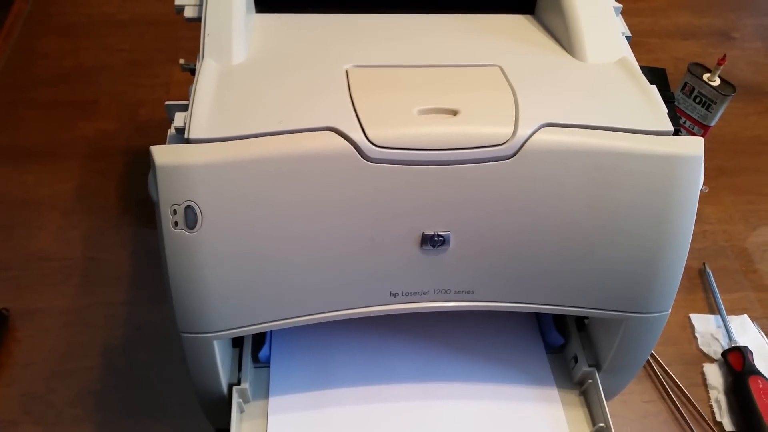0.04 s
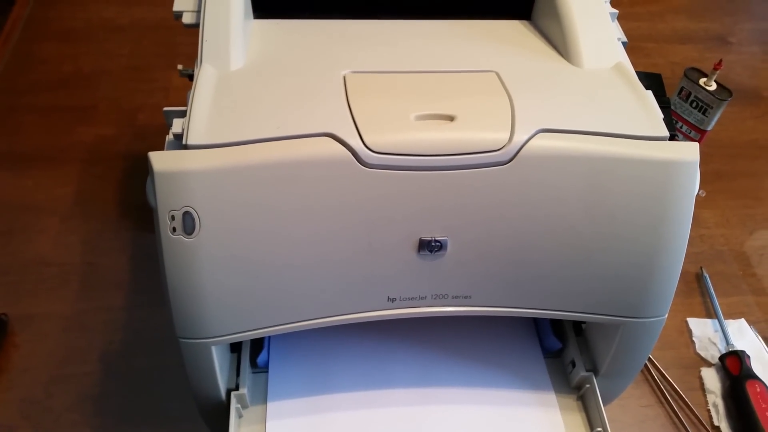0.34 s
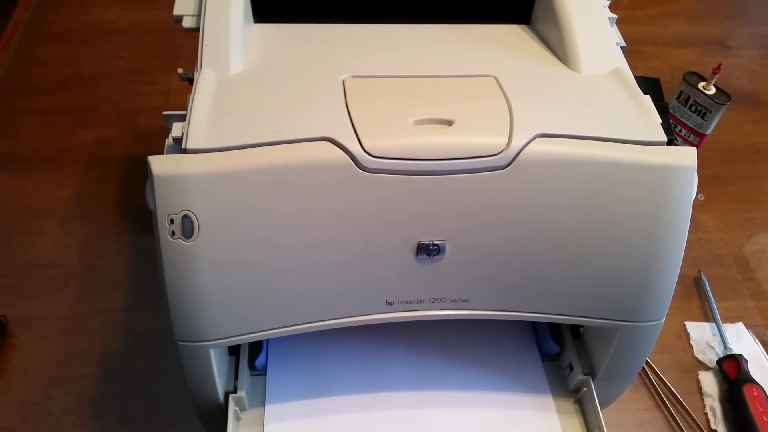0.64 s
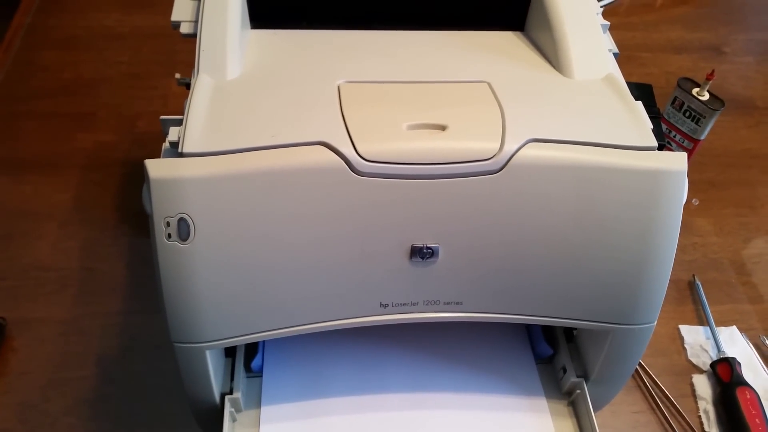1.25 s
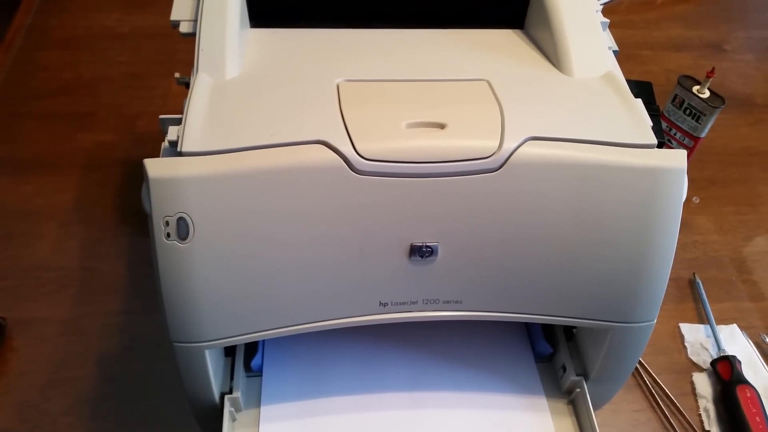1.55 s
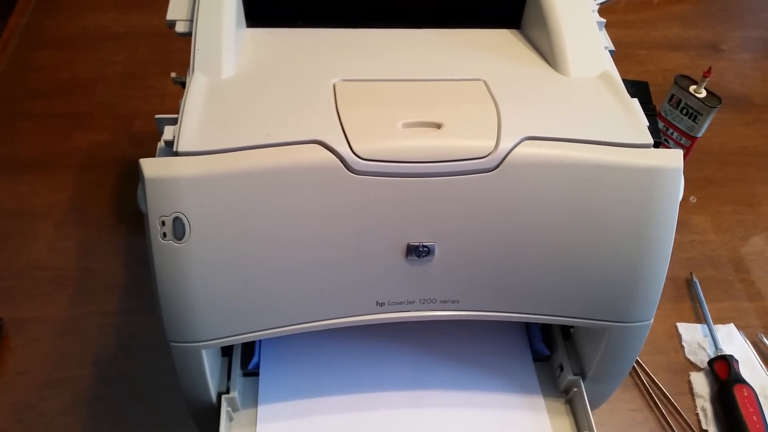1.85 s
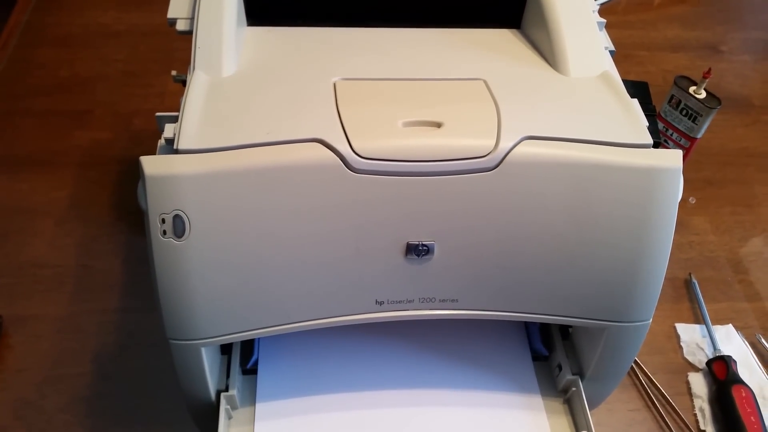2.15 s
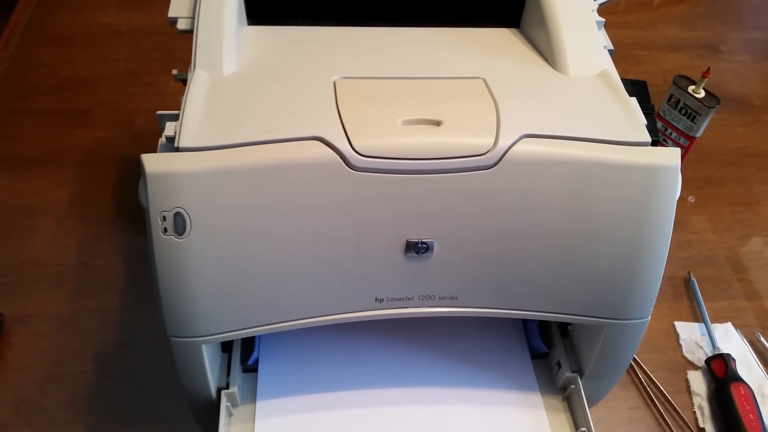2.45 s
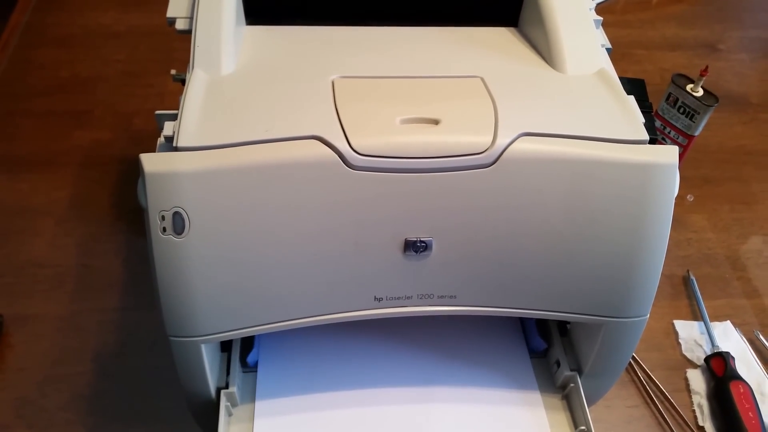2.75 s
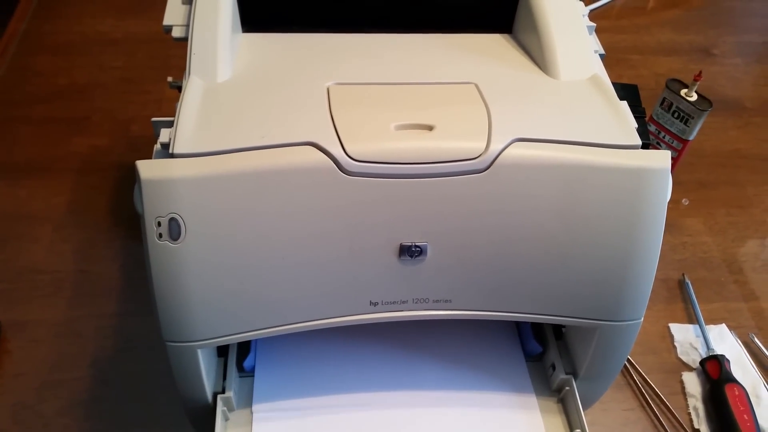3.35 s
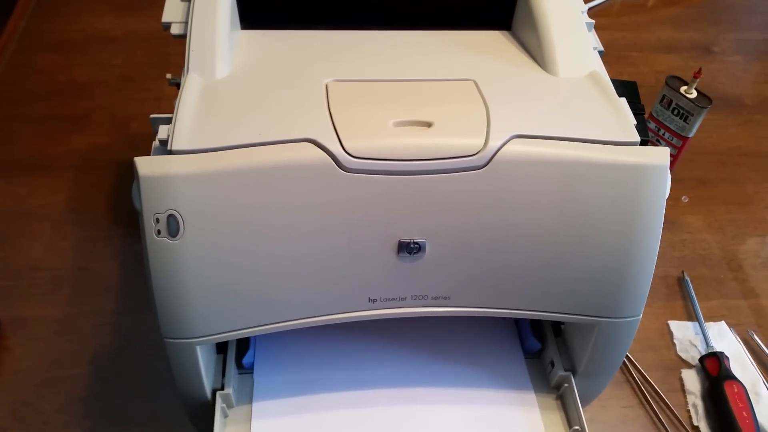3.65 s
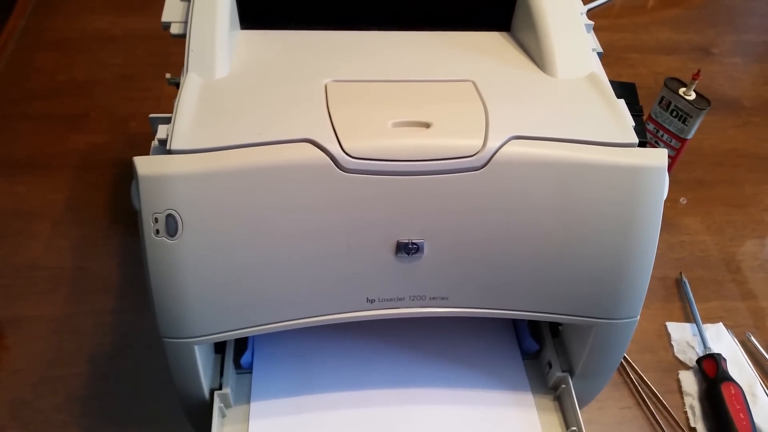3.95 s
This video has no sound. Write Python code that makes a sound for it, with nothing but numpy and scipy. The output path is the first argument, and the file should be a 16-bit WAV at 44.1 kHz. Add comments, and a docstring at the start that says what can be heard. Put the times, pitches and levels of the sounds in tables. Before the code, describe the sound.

A laser printer runs close by indoors, its motor and gears whining over fan noise. Midway, sharp clicks and plastic clunks start the rollers, and a sheet slides in with a hiss. The hand-held microphone is softly bumped.

```python
"""A laser printer runs on a wooden table, heard from close by. From the start its stepper motor and gears
whine over fan noise, while the mirror motor spins up, overshoots and locks at 1 s. Near 1.75 s a solenoid
clicks, the pick-up mechanism knocks in the plastic case and the feed rollers start. From 2.1 s a sheet
slides off the stack with a hiss of friction, and the rollers carry it on to the end. Now and then in the
first three seconds the hand-held microphone is bumped."""
import sys
import numpy as np
from scipy import signal
from scipy.fft import rfft, irfft
from scipy.io import wavfile

SR = 44100
rng = np.random.default_rng(int(sys.argv[2]) if len(sys.argv) > 2 else 0)


def unload_audio(sound):
    """Save the sound as a 16-bit wav file, at the path given as the first command line argument."""
    columns = np.transpose(np.atleast_2d(sound))
    # keep every value between -1 and 1, then stretch to whole-number steps
    steps = np.round(np.clip(columns, -1, 1) * 32767)
    wavfile.write(sys.argv[1], SR, steps.astype(np.int16))


N = 176400
TIME = np.arange(N) / SR

# Low stepper harmonics and thin upper ones: multiples of the step rate; left_db, right_db of each
STEPPER_MULTIPLES = [1, 2, 3, 4, 5, 6, 8, 10, 12]
STEPPER_LEVELS = [(-55, -53), (-48, -49.5), (-49, -48), (-48, -63), (-61, -56), (-74, -72), (-61, -65),
                  (-66, -65.5), (-78, -70)]
WHINE_MULTIPLES = [14, 16, 18, 22, 24, 26, 28, 32, 34, 40, 42, 44, 46, 48, 54, 58]
WHINE_LEVELS = [(-70, -60), (-72.5, -71.5), (-68, -69.5), (-73, -88), (-84, -67.5), (-87, -72.5),
                (-82, -65.5), (-78, -69), (-80, -64.5), (-82, -84), (-70, -72), (-62, -62.5), (-80, -66),
                (-77, -76), (-71, -83), (-81, -82)]
# Load of the paper feed on motor, gears and rollers: time_s, level_db
FEED_LOAD = [(1.72, -28), (1.77, -4), (2.0, -4.5), (2.15, -3.5), (2.6, 0), (2.8, 2), (3.1, 1.5), (3.5, 0),
             (4, 2)]

def stepper_motor(step_hz=231.48, load_boost_db=2.5):
    """Periodic forcing: torque pulses give harmonics of the step rate; the upper ones grow under load."""
    hum = partials(STEPPER_MULTIPLES, STEPPER_LEVELS, step_hz, sway=.32, sway_hz=7.8)
    whine = partials(WHINE_MULTIPLES, WHINE_LEVELS, step_hz, sway=.28, sway_hz=5)
    return hum + whine * from_db(load_boost_db * envelope(FEED_LOAD))


def gears(drive_hz=1237.5, feed_hz=1838):
    """Tooth meshing: the drive gears sing throughout, the feed gears in proportion to the load."""
    drive = partials([1 / 4, 1], [(-61.5, -57), (-39.5, -40.5)], drive_hz, sway=.071, sway_hz=12)
    feed = partials([1], [(-58, -58)], feed_hz, sway=.44, sway_hz=6.7)
    return drive + feed * envelope(FEED_LOAD)


# Spin-up and overshoot of the mirror: time_s, rotation_hz
MIRROR_SPEED = [(0, 385), (.2, 446), (.42, 500), (.58, 534), (.65, 541), (.72, 509), (.8, 499), (.92, 507)]
# Case resonances that its whine sweeps through: rotation_hz, gain_db
MIRROR_RESONANCES = [(385, -4), (420, -9), (450, 5), (470, -3), (495, -1), (505, 0.5), (520, 6), (532, -2)]

def mirror_motor(lock_s=1.0, locked_hz=505.1):
    """Forced resonance: the rotor's harmonics swell as its speed passes the resonances of the case."""
    rotation_hz = np.interp(TIME, *np.transpose(MIRROR_SPEED + [(lock_s, locked_hz)]))
    levels_db = [(-55, -58), (-65, -63), (-53.5, -49.5)]
    whine = partials([1, 2, 4], levels_db, rotation_hz, sway=.18, sway_hz=7)
    return whine * from_db(at_hz(MIRROR_RESONANCES, rotation_hz))


# Knocks of plastic parts: start_s, case_db, tilt_db_per_octave, contact_s, ring_hz, ring_db, ring_t60_s
KNOCKS = [(.002, -11, -6.5, .002, 394, -30, 0.21), (.886, -11, -9, 0.0013, 403, -26.5, 0.068),
          (.917, -24, -11, .002, 402, -28.5, 0.083), (1.7585, 0, 1, .001, 978, -7.5, 0.026),
          (1.773, -4, -1.5, .002, 345, -31, 0.15), (1.813, -4.5, -1, 0.0025, 800, -43, 0.034),
          (1.824, -13, -2, .001, 350, -24, 0.055), (1.872, -10, -5.5, 0.0036, 757, -26.5, .06),
          (1.911, -20, -3, .002, 800, -20.5, 0.028), (2.051, -7, 0.5, 0.00071, 323, -25, 0.13),
          (2.066, -16, -5, .002, 734, -24, .05), (2.228, -20.5, 2.5, .003, 680, -30, 0.044),
          (2.512, -13, -3, 0.0026, 470, -48, 0.055), (2.665, -11.5, -9, 0.0023, 723, -25.5, .04),
          (2.782, -7, 0, 0.0027, 970, -22, .04), (2.7866, -7, -1.5, 0.0016, 898, -22, .04),
          (2.8415, -3.5, -6, .002, 878, -12, 0.026), (2.852, -16, -8, .002, 233, -21.5, 0.053),
          (3.555, -15, -7, .0005, 800, -26, 0.018), (3.585, -24, -4, .004, 440, -34, .15)]
# Response of the case to a knock: frequency_hz, density_db
CASE_SPECTRUM = [(60, -65), (180, -68), (350, -58), (600, -51.5), (1000, -53), (1500, -55.5), (2300, -54.5),
                 (3200, -64.5), (6000, -73.5), (10000, -71.5), (14000, -99)]

def pickup_knocks(left_minus_right_db=-1.5):
    """Impact excitation: each struck part rings in one mode, along with the many modes of the case."""
    out = np.zeros((2, N))
    pan_db = left_minus_right_db * np.array([[.5], [-.5]])
    for start_s, case_db, tilt_db, contact_s, ring_hz, ring_db, t60_s in KNOCKS:
        part = from_db(ring_db + pan_db) * ring(ring_hz, t60_s, build_s=.0014)
        case = from_db(case_db) * burst(CASE_SPECTRUM, contact_s, tilt_db=tilt_db)
        add(out, start_s, case + part)
    return out


# Solenoid and latch clicks: start_s, level_db, length_factor
CLICKS = [(1.7476, -0.5, .8), (2.021, 0.5, 1.0), (2.051, -5.5, .5), (3.004, -1.5, 0.37)]
# Spectrum of a click: frequency_hz, density_db
CLICK_SPECTRUM = [(150, -72), (500, -57.5), (1000, -59.5), (2000, -61.5), (3200, -67.5), (5000, -68.5),
                  (7000, -74.5), (10000, -63.5), (14000, -74)]

def solenoid_clicks():
    """Impulse response: a very short contact excites a wide band of frequencies."""
    out = np.zeros((2, N))
    for start_s, level_db, length in CLICKS:
        add(out, start_s, from_db(level_db) * burst(CLICK_SPECTRUM, attack_s=.00065, length=length))
    return out


# Rollers, sliding sheet, and case and tray under the turning pick-up cam: frequency_hz, density_db
ROLLER_SPECTRUM = [(100, -88), (400, -81), (1000, -88), (2000, -85.5), (3000, -90.5), (5000, -94.5),
                   (7000, -91.5), (10000, -90), (11500, -95), (13000, -90.5), (14500, -112)]
SLIDE_SPECTRUM = [(200, -92), (600, -74.5), (1200, -76.5), (2500, -89), (4000, -90.5), (6000, -89.5),
                  (7300, -81.5), (8200, -85), (10000, -83.5), (12000, -87.5), (14500, -89)]
RUMBLE_SPECTRUM = [(30, -90), (100, -73.5), (200, -64), (330, -71.5), (450, -63), (600, -75), (900, -78.5),
                   (1500, -86.5)]
# Course of the slide and of the rumble: time_s, level_db
SLIDE_LEVEL = [(2.1, -28), (2.15, -0.5), (2.35, -1), (2.42, 1), (2.51, 2), (2.56, -8), (2.7, -28)]
RUMBLE_LEVEL = [(1.75, -30), (1.8, 1.5), (1.92, 3), (2.0, -16), (2.08, 3), (2.2, -15), (2.46, -18),
                (2.53, 2), (2.62, -20), (2.7, 2.5), (2.8, -2.5), (2.89, 5.5), (3.0, -19), (3.15, -44)]

def paper_feed(grain_db=1.27):
    """Friction noise: rollers and sheet rub with a fine grain, over the rumble of case and tray."""
    rollers = noise(ROLLER_SPECTRUM) * envelope(FEED_LOAD)
    sheet = noise(SLIDE_SPECTRUM) * envelope(SLIDE_LEVEL)
    grain = from_db(grain_db * drift(250))
    rumble = noise(RUMBLE_SPECTRUM) * envelope(RUMBLE_LEVEL)
    return (rollers + sheet) * grain + rumble


# Soft bumps on the microphone: start_s, level_db, pitch_hz
BUMPS = [(0.271, -30, 141), (.351, -27.5, 110), (0.637, -20, 135), (.982, -22, 80), (1.888, -21.5, 96.5),
         (2.913, -17, 130), (2.932, -19.5, 103)]
# Deep rumble of the grip: frequency_hz, density_db; and its course: time_s, level_db
HANDLING_SPECTRUM = [(15, -71), (32, -65), (50, -71), (120, -100)]
HANDLING_LEVEL = [(1.85, -25), (2.0, -1), (2.1, 3.5), (2.25, -4), (2.35, -14), (2.55, -16), (2.62, -4),
                  (2.8, -22)]

def handling(right_db=-32.5):
    """Structure-borne sound: fingers shift on the microphone's housing and bump it, mostly on the left."""
    out = noise(HANDLING_SPECTRUM) * envelope(HANDLING_LEVEL)
    for start_s, level_db, pitch_hz in BUMPS:
        thump = 2 * ring(pitch_hz, t60_s=.037, build_s=.003)
        add(out, start_s, from_db([[level_db], [level_db + right_db]]) * thump)
    return out


# Rush of the fan and gear train: frequency_hz, density_db
FAN_SPECTRUM = [(25, -86), (48, -90), (75, -73.5), (100, -82.5), (135, -75.5), (160, -75), (225, -70.5),
                (270, -78.5), (335, -67.5), (420, -78), (520, -75.5), (600, -81), (770, -74.5), (1070, -88),
                (1350, -79.5), (1560, -82), (1850, -76.5), (2200, -84.5), (2900, -96.5), (3400, -89.5),
                (5000, -96.5), (7000, -93), (10000, -95.5), (11000, -94), (14500, -101.5)]

def fan(blade_hz=135.5, flutter_db=1.0):
    """Turbulence gives a broad, fluttering rush; the passing blades add an uneven hum."""
    rush = noise(FAN_SPECTRUM) * from_db(flutter_db * drift(30))
    return rush + partials([1], [(-60, -59.5)], blade_hz, sway=.45, sway_hz=6)


# Likeness of the sound at the two microphone ports: frequency_hz, correlation (limited to 1 in use)
COHERENCE = [(40, 0.67), (250, 1.1), (600, 1.03), (1200, 0.93), (2000, 0.38), (4000, 0), (8000, 0.08),
             (13000, 0)]
# Level difference between the ports: frequency_hz, left_minus_right_db
BALANCE = [(100, 0.5), (600, -1.5), (1200, -1.5), (2200, -7), (3600, -3), (5500, -14), (7500, -12),
           (10000, 0.5), (13000, 4)]

def noise(spectrum, size=N, tilt_db=0):
    """Partial coherence: shared and opposed noise mix at the two ports; tilt_db is per octave."""
    hz = np.fft.rfftfreq(size, 1 / SR) + 1
    mid, side = rfft(rng.standard_normal((2, size)))
    alike, sign = np.clip(at_hz(COHERENCE, hz), -1, 1), np.array([[1], [-1]])
    stereo = np.sqrt(1 + alike) * mid + sign * np.sqrt(1 - alike) * side
    pan = from_db(sign * at_hz(BALANCE, hz) / 2)
    pan /= np.sqrt(np.mean(pan ** 2, axis=0))
    octaves = np.log2(np.maximum(hz, 400) / 1000)
    rolloff = np.maximum(1, hz / spectrum[-1][0]) ** 2
    gain = from_db(at_hz(spectrum, hz) + tilt_db * octaves) / rolloff
    return irfft(stereo * pan * gain, size) * np.sqrt(SR) / 2


def partials(multiples, levels_db, hz, sway, sway_hz):
    """Random modulation: multiples of a rate waver in strength and phase. Levels are (left, right)."""
    out = np.zeros((2, N))
    phase = 2 * np.pi * np.cumsum(hz * np.ones(N)) / SR
    for multiple, (left_db, right_db) in zip(multiples, levels_db):
        tone = np.exp(1j * (multiple * phase + 2 * np.pi * rng.random()))
        tone *= 1 + sway * (drift(sway_hz) + 1j * drift(sway_hz))
        # High partials reach the two ports out of step.
        lag = np.arccos(np.clip(at_hz(COHERENCE, multiple * np.mean(hz)), -1, 1))
        out[0] += from_db(left_db) * tone.real
        out[1] += from_db(right_db) * (tone * np.exp(1j * lag)).real
    return np.sqrt(2) * out


def burst(spectrum, attack_s, tilt_db=0, length=1):
    """Modal overlap: dense case modes decay as noise; length scales their decay and the room's gain."""
    t = TIME[:SR // 2]
    case_t60_s, room_t60_s, room_db = .083 * length, .4, -11.5
    case = noise(spectrum, len(t), tilt_db) * from_db(-60 * t / case_t60_s)
    room = noise(spectrum, len(t), tilt_db) * from_db(room_db - 60 * t / room_t60_s) * length
    return (case + room) * (1 - np.exp(-t / attack_s))


def ring(hz, t60_s, build_s):
    """Damped oscillator: one mode builds up quickly and decays exponentially."""
    t = TIME[:SR // 2]
    return np.sin(2 * np.pi * hz * t) * from_db(-60 * t / t60_s) * (1 - np.exp(-t / build_s))


def drift(corner_hz):
    """Low-pass noise: a random fluctuation of unit standard deviation."""
    hz = np.fft.rfftfreq(N, 1 / SR)
    slow = irfft(rfft(rng.standard_normal(N)) / (1 + (hz / corner_hz) ** 2), N)
    return slow / slow.std()


def from_db(db):
    """Amplitude ratio from decibels."""
    return 10 ** (np.asarray(db) / 20)


def at_hz(points, hz):
    """Interpolation on a log-frequency axis."""
    frequencies, values = np.transpose(points)
    return np.interp(np.log(hz + 1e-6), np.log(frequencies), values)


def envelope(points):
    """Amplitude envelope through points of time_s, level_db."""
    return from_db(np.interp(TIME, *np.transpose(points)))


def add(out, start_s, sound):
    """Superposition of a short sound from its start time."""
    start = max(0, int(start_s * SR))
    out[:, start:start + sound.shape[1]] += sound[:, :N - start]


def scene():
    """Superposition: the printer's sources and the handling noise add at the microphone."""
    drive = stepper_motor() + gears() + mirror_motor()
    return drive + pickup_knocks() + solenoid_clicks() + paper_feed() + handling() + fan()


def record(dry):
    """Linear filtering: the microphone ports notch the treble, and a steep low-pass removes the top."""
    notch_hz, notch_q, notch_db, cutoff_hz = 8570, 3.8, -86, 14550
    notched = signal.lfilter(*signal.iirnotch(notch_hz, notch_q, fs=SR), dry)
    coloured = notched + from_db(notch_db) * (dry - notched)
    return signal.sosfilt(signal.ellip(10, .1, 80, cutoff_hz, fs=SR, output="sos"), coloured)


dry = scene()
out = record(dry)
unload_audio(out)
```